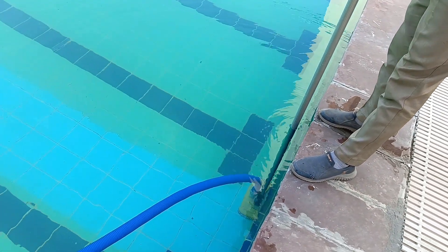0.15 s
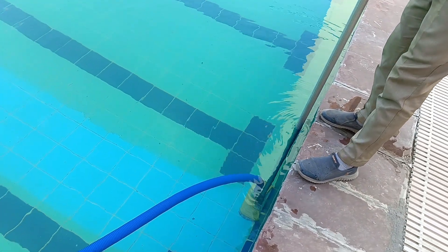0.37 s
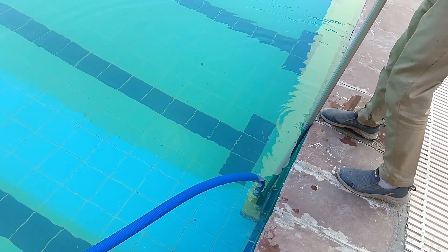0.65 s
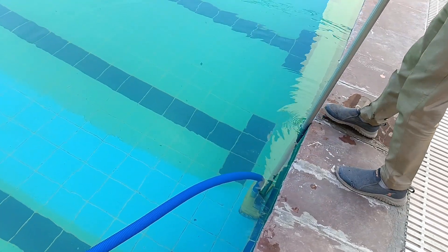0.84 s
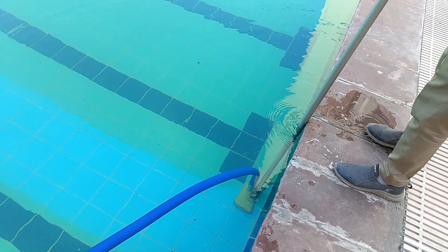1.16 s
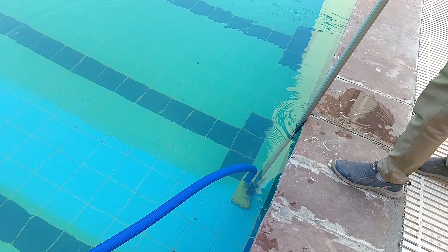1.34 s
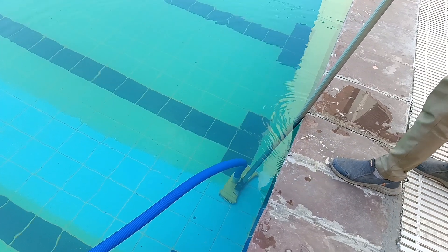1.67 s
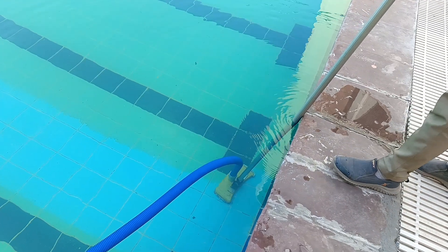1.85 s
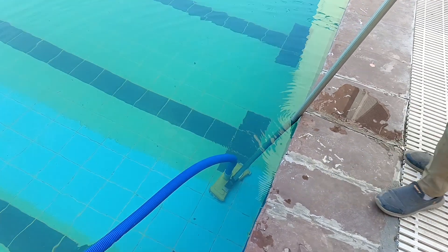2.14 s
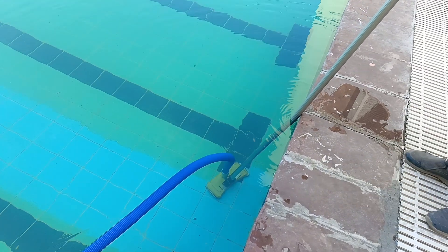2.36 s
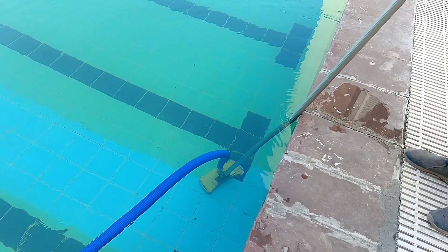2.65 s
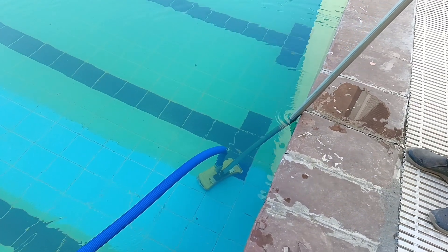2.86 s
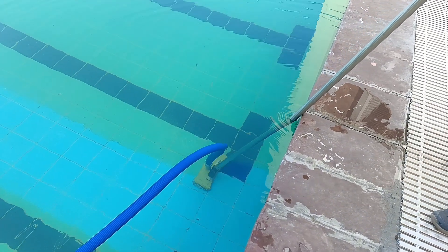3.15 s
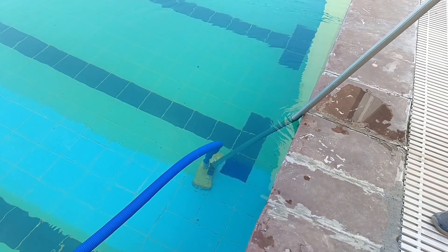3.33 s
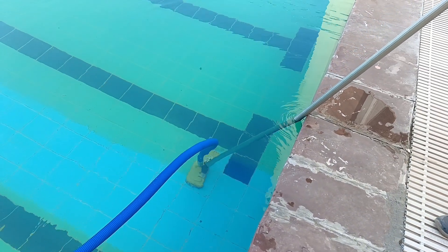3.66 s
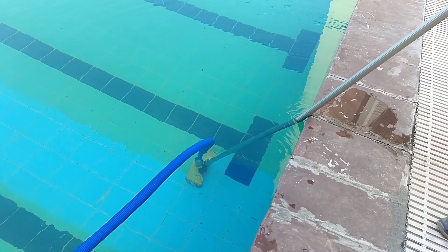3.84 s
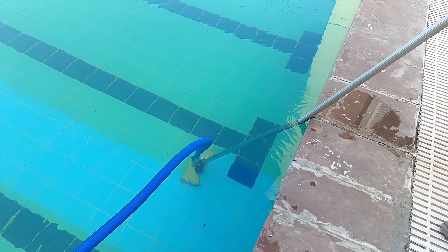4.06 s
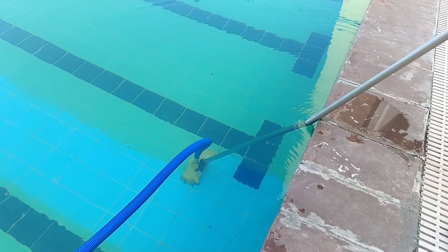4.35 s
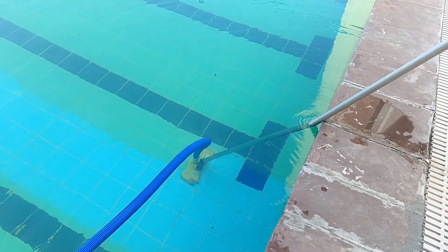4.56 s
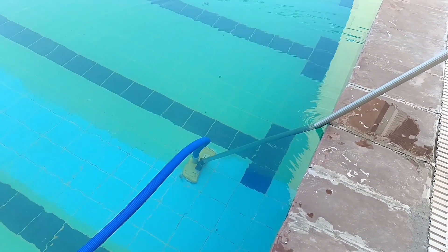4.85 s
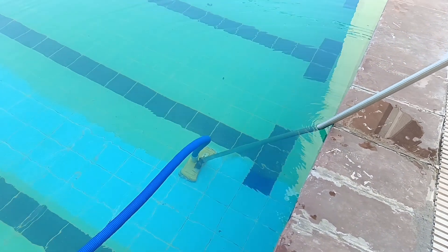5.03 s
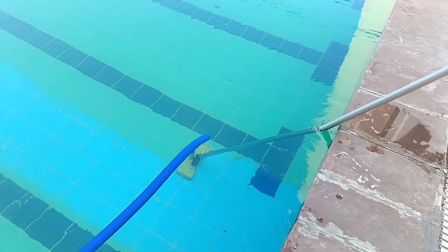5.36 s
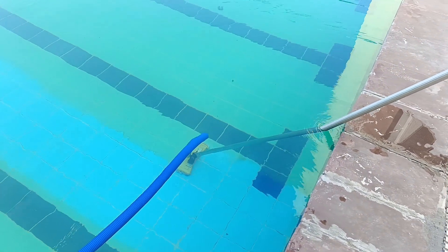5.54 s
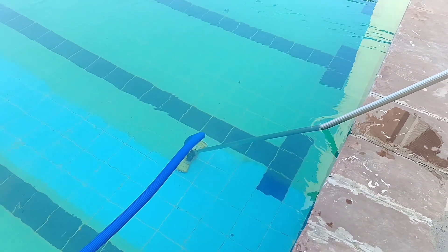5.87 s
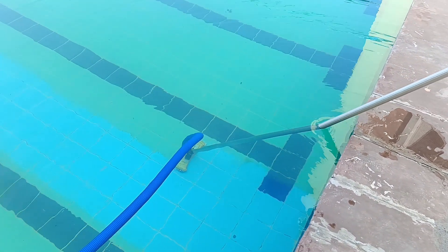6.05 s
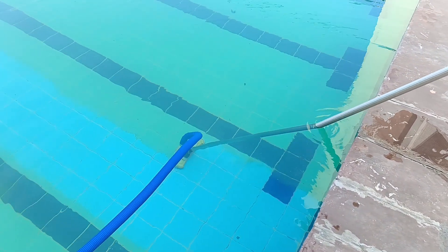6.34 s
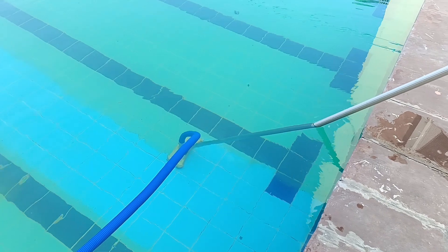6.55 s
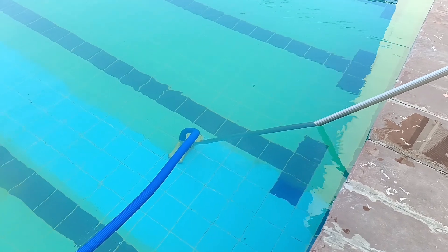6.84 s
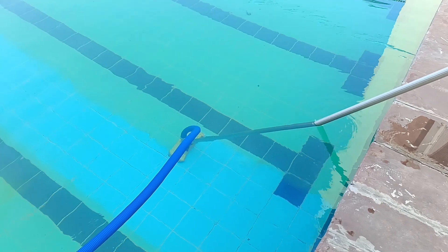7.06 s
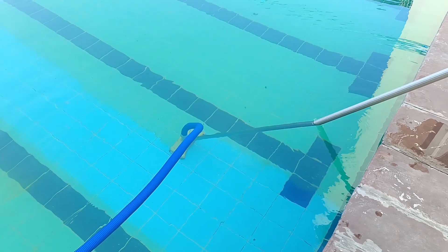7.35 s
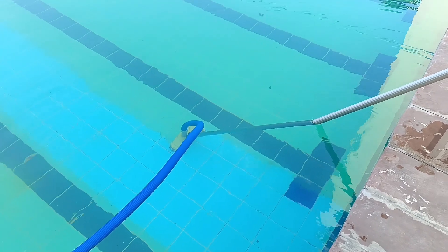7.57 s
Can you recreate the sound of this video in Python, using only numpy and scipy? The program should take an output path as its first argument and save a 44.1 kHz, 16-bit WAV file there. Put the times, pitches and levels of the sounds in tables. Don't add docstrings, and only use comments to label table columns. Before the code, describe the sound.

A continuous low motor drone dominates, with many steady tones, a faint whine and a muffled casing rumble that swells irregularly. Breathy pipe and fan noise fills the middle range. Over it, quiet bright grit snaps, short sole slides, twists and small heel knocks come from nearby stone, mostly during the first three and a half seconds. Open air, small stereo device, dull above the high treble.

```python
import sys
import numpy as np
from scipy import signal
from scipy.fft import rfft, irfft, next_fast_len
from scipy.io import wavfile
from scipy.ndimage import uniform_filter1d

SR = 44100
rng = np.random.default_rng(int(sys.argv[2]) if len(sys.argv) > 2 else 0)


def pcm_store(signal):
    levels = np.round(np.clip(np.atleast_2d(signal), -1, 1) * 32767)
    wavfile.write(sys.argv[1], SR, levels.astype(np.int16).T)


def ratio_of_db(decibels):
    return 10 ** (np.asarray(decibels, float) / 20)


N = 339614


def evened(x):
    return x / np.sqrt(np.mean(x ** 2) + 1e-20)


def read(points, hz):
    point_hz, value = np.transpose(points)
    return np.interp(np.log(hz + 1), np.log(point_hz + 1), value)


def slow(rate_hz, size=N):
    t = np.arange(0, size + 256, 256) / SR
    wave = sum(np.sin(2 * np.pi * (hz * t + rng.random())) / np.sqrt(hz)
               for hz in np.geomspace(rate_hz / 8, rate_hz, 20))
    return np.interp(np.arange(size) / SR, t, evened(wave))


def coloured(x, points):
    size = next_fast_len(x.shape[-1])
    gain = ratio_of_db(read(points, np.fft.rfftfreq(size, 1 / SR)))
    return irfft(rfft(x, size) * gain, size)[..., :x.shape[-1]]


SHAFT_HZ, MAINS_HZ, SLOT_HZ = 23.855, 100.0, 491.2
MAINS_DB, SLOT3_DB, SLOT4_DB = -48, -72.5, -66.5
SHAFT_ORDERS = [3, 6, 7, 9, 12, 15, 21, 22, 23, 26]
# level_db, waver_db
SHAFT_LEVELS = [(-41, 1.5), (-44.5, 3), (-45, 6), (-38, 0.5), (-46, 0), (-56.5, 3), (-54.5, -0.5),
                (-46.5, 2), (-58, 4), (-74, 7.5)]


def motor():
    t = np.arange(N) / SR
    turns = SHAFT_HZ * t + 0.0023 * slow(3.0)
    tones = [(order * turns, db, waver_db) for order, (db, waver_db) in zip(SHAFT_ORDERS, SHAFT_LEVELS)]
    tones.append((MAINS_HZ * t, MAINS_DB, 2.0))
    tones.append((3 * SLOT_HZ * t, SLOT3_DB, 2.0))
    tones.append((4 * SLOT_HZ * t, SLOT4_DB, 2.0))
    out = np.zeros(N)
    for cycles, db, waver_db in tones:
        strength = np.sqrt(2) * ratio_of_db(db + waver_db * slow(12.0))
        out += strength * np.sin(2 * np.pi * (cycles + rng.random()))
    return out


# pitch_hz, width_hz
CASING_MODES = [
    (167.1, 8.2),
    (215.8, 7.4),
]
# peak_s, level_db, half_length_s
LOW_SURGES = [(0.065, -35, 0.047), (0.207, -36, 0.13), (0.92, -29.5, .06), (1.286, -27, 0.041),
              (1.604, -32, 0.13), (1.954, -36, 0.18), (2.215, -30, 0.035), (2.606, -33.5, .12),
              (2.853, -33, 0.075), (3.323, -27.5, .12), (3.57, -32.5, .1), (3.782, -32, 0.12),
              (4.048, -43, 0.052), (4.348, -31.5, 0.051), (4.554, -32.5, 0.15), (4.94, -36, 0.29),
              (5.523, -34.5, .05), (5.68, -28, 0.043), (5.847, -28, 0.083), (6.05, -34, 0.12),
              (6.23, -33.5, 0.049), (6.37, -35, 0.071), (6.65, -41, 0.053), (6.982, -30, 0.11),
              (7.2, -36, 0.087), (7.542, -33.5, 0.2)]
# peak_s, level_db, half_length_s
HIGH_SURGES = [(0.101, -24.5, 0.026), (.19, -25, 0.017), (.7, -29.5, 0.23), (1.1, -25.5, 0.095),
               (1.45, -32, 0.17), (2.14, -32, 0.4), (2.419, -28.5, 0.035), (2.7, -29, 0.061),
               (2.9, -31.5, 0.051), (3.2, -38, 0.18), (3.359, -28, 0.073), (3.58, -29, 0.18),
               (3.8, -34.5, 0.15), (3.98, -35, .1), (4.14, -29, 0.28), (4.42, -33.5, 0.066),
               (4.8, -30.5, 0.18), (5.1, -31.5, .2), (5.31, -30, 0.2), (5.49, -25.5, 0.043),
               (5.77, -27, .05), (5.9, -33, 0.037), (6.08, -29, 0.12), (6.38, -31, 0.16),
               (6.87, -30.5, 0.13), (7.14, -27, 0.098), (7.379, -31.5, 0.095), (7.56, -32, 0.084)]
SURGE_FALL_DB, CALM_DB = 11.5, -41.5
SURGE_ROUND = 1.23


def casing():
    t, out = np.arange(N) / SR, np.zeros(N)
    coarse_s = t[::64]
    for (hz, width_hz), surges in zip(CASING_MODES, (LOW_SURGES, HIGH_SURGES)):
        r = np.exp(-np.pi * width_hz / SR)
        ring = [1, 1j] @ rng.standard_normal((2, N))
        for pole in (r, r ** 3):
            ring = signal.lfilter([1 - pole], [1, -pole], ring)
        ring /= np.sqrt(uniform_filter1d(abs(ring) ** 2, 1500)) + 1e-9
        power = ratio_of_db(2 * CALM_DB)
        for peak_s, db, half_s in surges:
            fall_db = SURGE_FALL_DB * (abs(coarse_s - peak_s) / half_s) ** SURGE_ROUND
            power = power + ratio_of_db(2 * (db - fall_db))
        tone = evened((ring * np.exp(2j * np.pi * hz * t)).real)
        out += np.interp(t, coarse_s, np.sqrt(power)) * tone
    return out


# freq_hz, density_db_per_hz
RUSH_LOW = [(25, -35.5), (40, -32.5), (52, -18.5), (85, -19), (110, -12), (190, -11), (240, -7),
            (285, -12.5), (305, -16), (355, -14), (380, -21.5), (560, -23), (680, -26), (900, -30)]
# freq_hz, density_db_per_hz
RUSH_HIGH = [(1000, -31.5), (1250, -34), (1650, -33), (2200, -36), (2600, -36), (3600, -43), (4300, -53.5),
             (6000, -57), (7500, -58.5), (10000, -64.5), (11500, -75.5), (12500, -77), (14600, -85),
             (15800, -84)]
# pitch_hz, width_hz, lift_db
PIPES = [(447, 55, 3.5), (695, 72, 5), (842, 50, 5.5), (966, 88, 4), (1108, 55, 5.5), (1165, 60, 3.5),
         (1337, 170, 6), (1528, 82, 5), (1780, 150, 3), (1952, 110, 4.5), (2133, 110, 5.5), (2337, 97, 4.5),
         (5330, 1200, 4.5), (6550, 500, 4), (9600, 900, 3.5), (14000, 1200, 2.5)]
RUSH_DB = -32


def rush():
    hz = np.geomspace(20, 20000, num=1500)
    lift_db = sum(db / (1 + (2 * (hz - pipe_hz) / width_hz) ** 2) for pipe_hz, width_hz, db in PIPES)
    spectrum_db = read([*RUSH_LOW, *RUSH_HIGH], hz) + lift_db
    noise = coloured(rng.standard_normal((2, N)), np.transpose([hz, spectrum_db]))
    breath_db = 0.073 * slow(2.7) + 0.5 * slow(16.0)
    return ratio_of_db(RUSH_DB + breath_db) * evened(noise)


# freq_hz, density_db_per_hz
SHEEN = [(9000, -65), (11000, -33), (11900, -12.5), (12900, 0.5), (14200, -5.5), (15700, -1.5)]


def hits(rows, t60_s):
    out, u = np.zeros((2, N)), np.arange(4000) / SR
    fall_db = 60 * u / t60_s
    decay = ratio_of_db(-fall_db) + 0.53 * ratio_of_db(-fall_db / 4)
    for start_s, peak_db, hz, sheen_db, knock_db in rows:
        burst = rng.standard_normal((2, len(u)))
        bright = evened(coloured(burst, [(hz / 3, -30), (hz / 1.27, -10), (hz, 0), (hz * 1.18, -11),
                                         (hz * 1.7, -22), (hz * 2.4, -70)]))
        knock = evened(coloured(burst, [(500, -29.5), (1100, -4.5), (1800, -4), (2800, -3.0),
                                        (4100, -8.0), (5200, -26), (8000, -81)]))
        sheen = evened(coloured(burst, SHEEN))
        body = bright + ratio_of_db(knock_db) * knock + ratio_of_db(sheen_db + 13.0) * sheen
        shape = (1 - np.exp(-u / 0.00062)) * ratio_of_db(peak_db - 5.5) * decay
        part = out[:, round(start_s * SR):][:, :len(u)]
        part += (shape * body)[:, :part.shape[1]]
    return out


# start_s, peak_db, pitch_hz, sheen_db
SNAPS = [(0.2418, -53.5, 5700, -35), (0.6789, -60, 4830, -13), (0.7194, -52, 6750, -14),
         (0.828, -48, 7220, -18), (0.8544, -54, 6170, -31), (1.0114, -48, 6520, -19),
         (1.348, -56, 6790, -16), (1.4641, -53, 7000, -16), (1.511, -49, 6970, -19),
         (1.765, -41, 6640, -16), (1.8292, -48, 6560, -32), (1.8924, -51, 6420, -19),
         (1.939, -46, 6700, -16), (2.0344, -60, 5260, -7), (3.8621, -54, 4770, -28),
         (4.1694, -61, 5310, -24), (4.5344, -59, 4910, -19)]
SNAP_T60_S, SNAP_KNOCK_DB = 0.022, -3.5


def snaps():
    return hits([(*row, SNAP_KNOCK_DB) for row in SNAPS], SNAP_T60_S)


# freq_hz, density_db_per_hz
GRIT = [(4000, -38), (5500, -17), (6100, -12.5), (6650, 0.5), (7300, -6), (8200, -8.5), (9200, -6),
        (10000, -20), (11500, -38.5)]
# freq_hz, density_db_per_hz
SCRAPE = [(3000, -27), (4200, 3), (5300, -2.5), (6200, -14), (8000, -35)]
# freq_hz, density_db_per_hz
SIZZLE = [(8500, -23), (9800, 2), (10800, -0.5), (11600, -11), (13000, -29.5)]
# peak_s, rise_s, fall_s, level_db
SCRAPES = [(.829, 0.032, 0.029, -56), (.943, .045, 0.06, -51), (1.04, 0.1, 0.077, -57),
           (2.41, .06, .12, -70.5), (2.6, .1, .1, -71), (2.668, 0.099, 0.058, -58.5), (2.82, .07, .09, -74),
           (3.0, 0.064, .2, -75), (3.07, .08, .08, -65), (3.19, 0.24, .09, -68.5), (3.46, 0.091, .5, -78),
           (3.96, 0.19, .13, -71), (4.078, .02, .04, -75), (4.362, .1, .1, -76), (4.59, .2, .02, -77),
           (5.045, .2, .2, -72)]
# peak_s, rise_s, fall_s, level_db
SLIDES = [
    (1.4, .2, .2, -67),
    (1.514, 0.12, .06, -56.5),
    (1.572, 0.11, 0.16, -55),
    (1.772, 0.012, 0.018, -50),
    (1.8, .02, 0.22, -69),
    (1.89, .04, 0.056, -67),
    (1.95, 0.033, .07, -61),
    (2.04, .1, .04, -69),
    (5.14, .2, .05, -71),
]
# peak_s, rise_s, fall_s, level_db
TWISTS = [
    (.69, .02, 0.078, -66),
    (3.35, 0.033, .05, -56.5),
]
# peak_s, rise_s, fall_s, level_db
RASPS = [
    (2.18, .015, 0.074, -63.5),
    (2.39, .03, 0.073, -74.5),
    (2.985, .03, .06, -73),
]
# sheen_db, scrape_db, sizzle_db
SCRAPE_MIX = (-10, 0.67, -20.5)
# sheen_db, scrape_db, sizzle_db
SLIDE_MIX = (-2, -5.5, -16)
# sheen_db, scrape_db, sizzle_db
TWIST_MIX = (-8, 0, -2.2)
# sheen_db, scrape_db, sizzle_db
RASP_MIX = (-13, 13, -17)
STROKE_FALL_DB = 22.5
STROKE_ROUND = 1.34


def drags():
    t, out = np.arange(N) / SR, np.zeros((2, N))
    crackle_db = 2.5 * np.minimum(rng.exponential(1, N // 16 + 1), 4)
    crackle = ratio_of_db(crackle_db).repeat(16)[:N]
    grains = rng.standard_normal((2, N)) * crackle * ratio_of_db(2.0 * slow(120.0))
    grit, *others = (evened(coloured(grains, colour)) for colour in (GRIT, SHEEN, SCRAPE, SIZZLE))
    kinds = ((SCRAPES, SCRAPE_MIX), (SLIDES, SLIDE_MIX), (TWISTS, TWIST_MIX), (RASPS, RASP_MIX))
    for strokes, mix_db in kinds:
        power = np.zeros(N)
        for peak_s, rise_s, fall_s, db in strokes:
            distance = np.maximum((peak_s - t) / rise_s, (t - peak_s) / fall_s)
            power += ratio_of_db(2 * (db - STROKE_FALL_DB * distance ** STROKE_ROUND))
        colour = grit + sum(ratio_of_db(db) * part for db, part in zip(mix_db, others))
        out += np.sqrt(power) * colour
    return out


# start_s, peak_db, pitch_hz, sheen_db, knock_db
TAPS = [
    (0.9394, -35, 6700, -28, 7.5),
    (2.658, -40.5, 6400, -35, 16),
    (3.2884, -37, 5800, -38, 11),
]
TAP_T60_S = 0.017


def taps():
    return hits(TAPS, TAP_T60_S)


def ports(pair, same_by_hz, turn_by_hz, tilt_by_hz):
    size = next_fast_len(N)
    hz = np.fft.rfftfreq(size, 1 / SR)
    left, stray = rfft(pair, size)
    same = read(same_by_hz, hz)
    tilt = ratio_of_db(read(tilt_by_hz, hz) / 2)
    right = (same * left + np.sqrt(1 - same ** 2) * stray) * np.exp(1j * read(turn_by_hz, hz))
    return irfft(np.array([left * tilt, right / tilt]), size)[:, :N]


# freq_hz, likeness_0_to_1
RUSH_SAME = [(60, .95), (300, .95), (640, .66), (1100, .3), (1500, .08), (1750, .42), (2200, .56),
             (2800, .28), (3600, .15), (5200, .28), (7000, .1), (15000, .1)]
# freq_hz, phase_rad
RUSH_TURN = [(60, 0), (1400, -.3), (1700, -1.2), (2200, -1.4), (2800, -2.3), (3500, -3), (4000, -4.4),
             (5000, -3), (6500, -3.8), (7600, -3), (9000, -3.3), (15000, -6)]
# freq_hz, difference_db
RUSH_TILT = [(60, -1.2), (200, -2), (2000, -2.3), (2750, -3.9), (3450, -6.3), (4150, -4.9), (4800, 0),
             (6200, 1), (6900, -6.8), (7600, -8.8), (8300, -3.9), (9650, .9), (11400, 12.5), (13800, 0)]
# freq_hz, likeness_0_to_1
SHOE_SAME = [(1000, .7), (15000, .6)]
# freq_hz, phase_rad
SHOE_TURN = [(1000, .2), (1700, 1.8), (2750, 3.1), (3800, 3.3), (4800, 4), (5800, 5.6), (6900, 6.3),
             (7900, 8.1), (10500, 8.3), (13000, 7.5), (16000, 8)]
# freq_hz, difference_db
SHOE_TILT = [(1000, -2), (3000, -5), (4800, 1), (6000, 0), (7500, -3), (9000, -9), (10000, -6), (11000, 0),
             (13000, -2), (15500, -4)]


def scene():
    tones = (motor() + casing()) * ratio_of_db([[-1.1], [1.1]])
    water_air = ports(rush(), RUSH_SAME, RUSH_TURN, RUSH_TILT)
    shoes = ports(snaps() + drags() + taps(), SHOE_SAME, SHOE_TURN, SHOE_TILT)
    return tones + water_air + shoes


def roll_off(x):
    return signal.sosfilt(signal.butter(12, 15890, fs=SR, output="sos"), x)


EDGE_HZ = 15740


def record(dry):
    hz, t, z = signal.stft(dry, SR, nperseg=1024, noverlap=512)
    patches = rng.random((len(t) // 2 + 1, len(hz) // 6 + 1))
    patches = patches.repeat(2, 0).repeat(6, 1)[:len(t), :len(hz)].T
    chance = np.interp(hz, [3500, 4500, 9000, 12000, 15500], [0, .03, .04, .14, .2])[:, None]
    dropout = np.where(patches < chance, ratio_of_db(-18.5), 1)
    flicker_db = np.interp(hz, [8000, 12500], [0, 1.8])[:, None] * rng.standard_normal(len(t))
    z = z * ratio_of_db(flicker_db) * dropout * (hz < EDGE_HZ)[:, None]
    thinned = signal.istft(z, SR, nperseg=1024, noverlap=512)[1][:, :N]
    fade_in = np.minimum(np.arange(N) / SR / 0.0012, 1)
    return roll_off(thinned * fade_in)


dry = scene()
out = record(dry)
pcm_store(out)
```